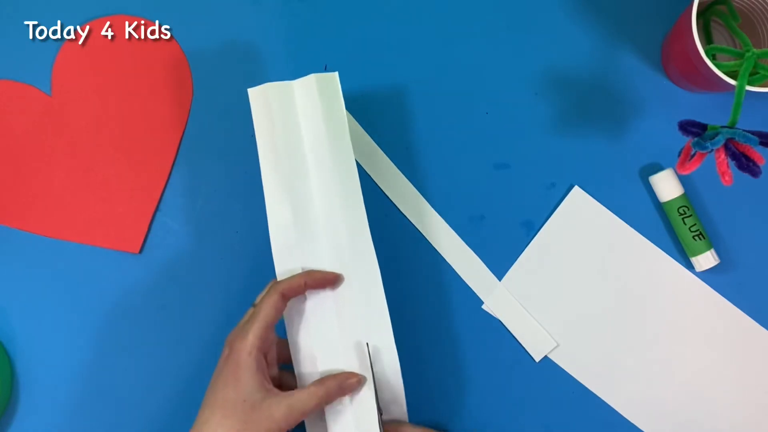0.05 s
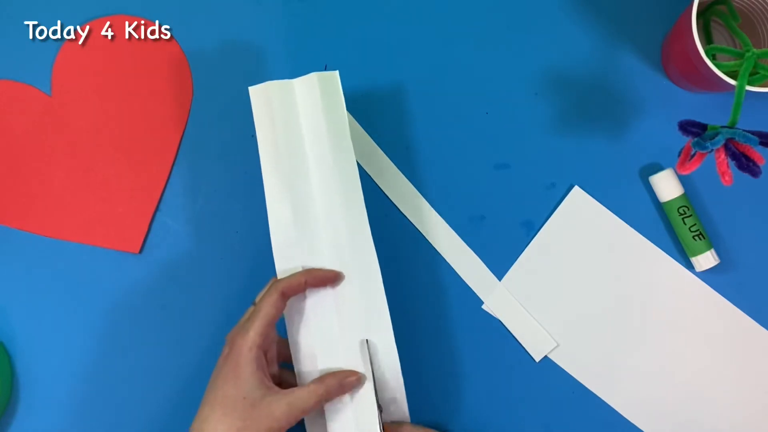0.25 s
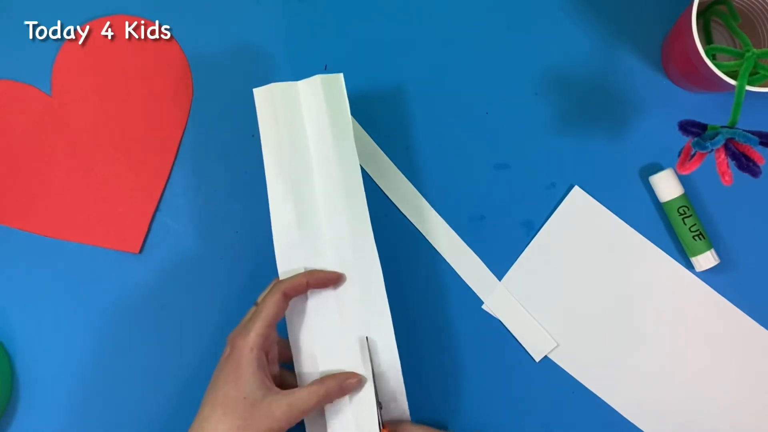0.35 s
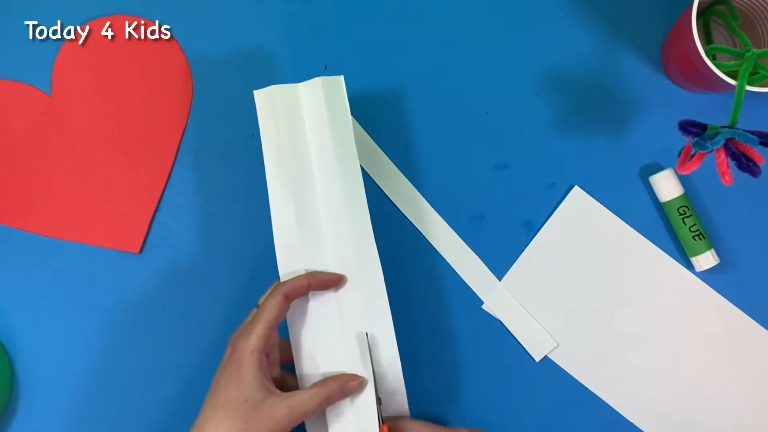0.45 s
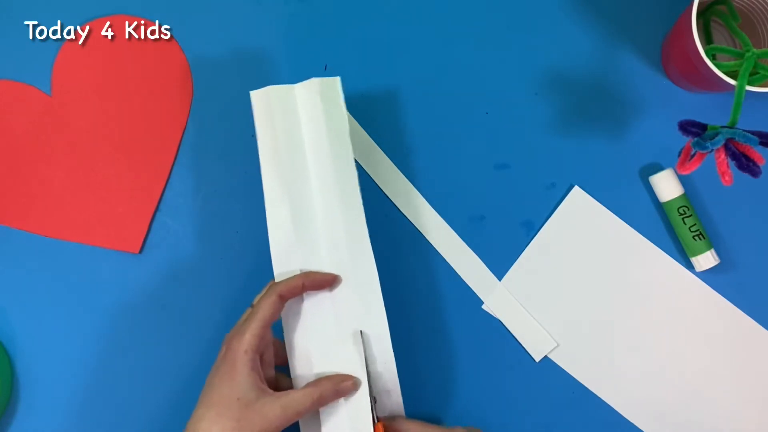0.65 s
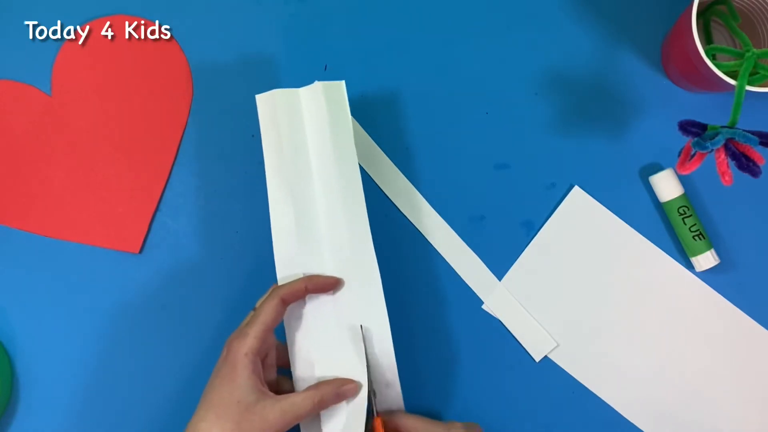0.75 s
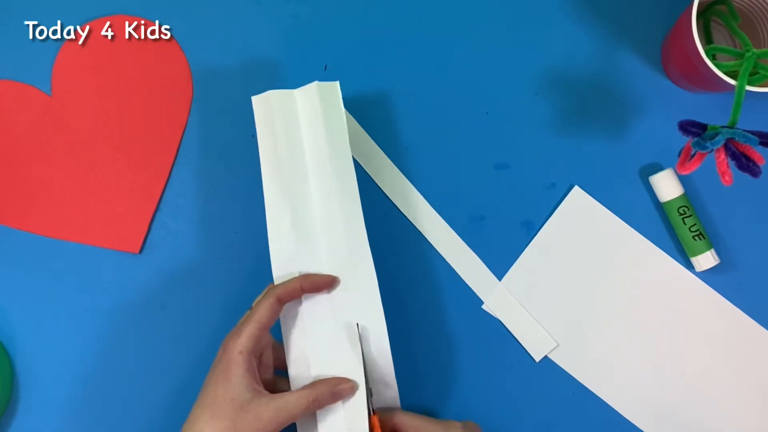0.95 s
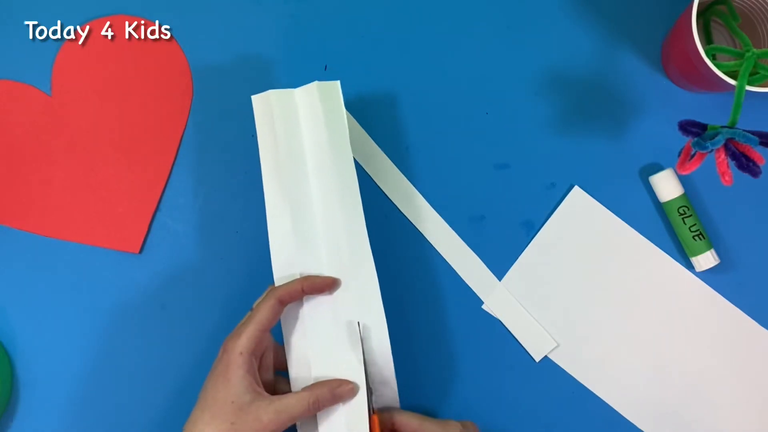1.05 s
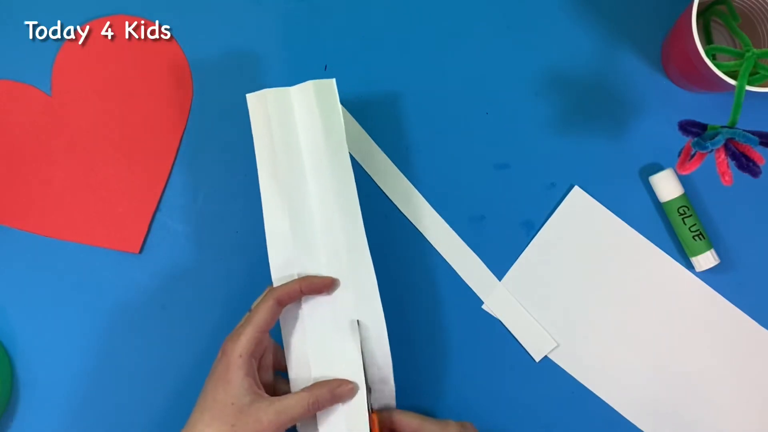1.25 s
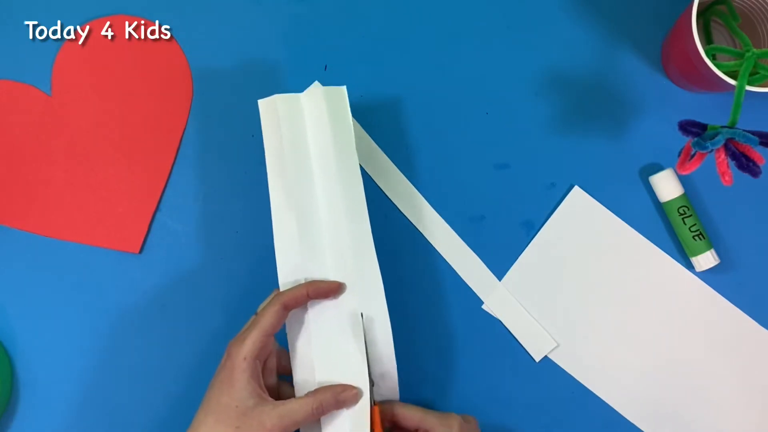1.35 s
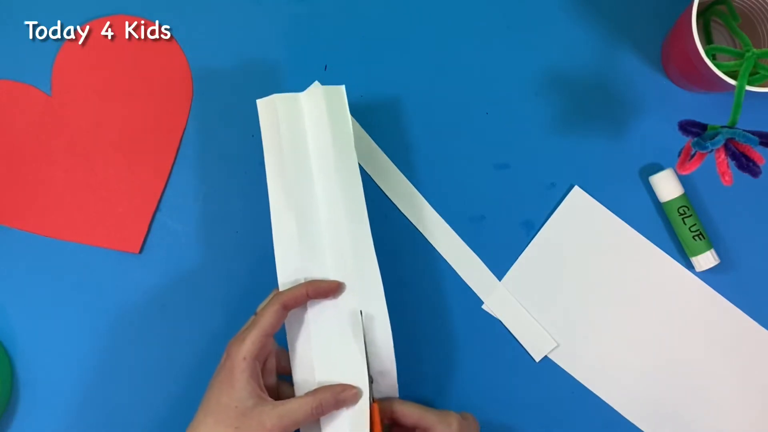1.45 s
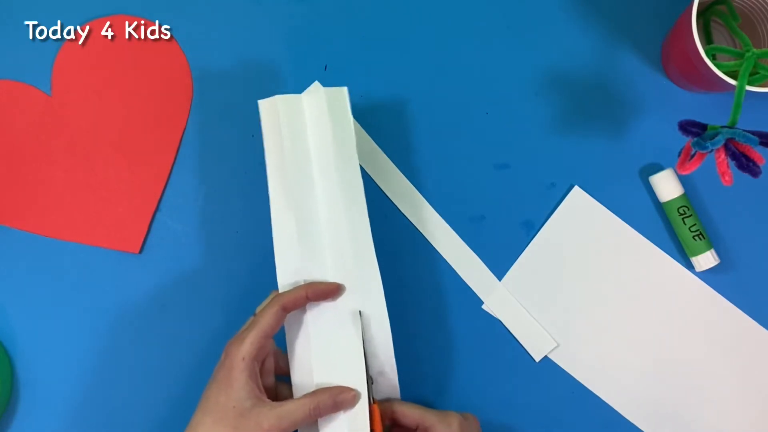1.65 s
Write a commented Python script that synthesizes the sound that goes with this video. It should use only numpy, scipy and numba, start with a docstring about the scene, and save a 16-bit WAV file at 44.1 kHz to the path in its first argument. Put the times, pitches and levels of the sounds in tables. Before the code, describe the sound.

Scissors cut folded paper, close in stereo in a small quiet room. A reopening rub starts it, then crunchy closing strokes at about 0.12-0.3, 0.46-0.65, 0.7-0.87, 1.08-1.28 and 1.45-1.63 seconds, the third fainter and brighter. Stuttering, squeaky slips fall near 0.35, 0.93, 1.32 and 1.68. Papery knocks sound at 0.41 and 0.57, the sharpest snap at 0.64. Faint low hum underneath.

```python
"""Scissors in folded paper

Scissors work through folded paper on a table, close to a two-port microphone.
Closing strokes shear the fibres in a dense rasp; opening strokes slip back in squeaking stutters.
The fold snaps and the sheet knocks. Strokes and snaps excite shared resonances of blades and sheet.
A small quiet room adds a short noisy tail, noise and a low wavering hum."""
import sys
import numpy as np
from scipy import signal
from scipy.fft import rfft, irfft, next_fast_len
from scipy.io import wavfile
from scipy.ndimage import uniform_filter1d
from numba import njit

SR = 44100
rng = np.random.default_rng(int(sys.argv[2]) if len(sys.argv) > 2 else 0)


def volts_from_db(level):
    """Convert decibel levels to linear amplitude ratios."""
    exponent = np.asarray(level, float) / 20
    return 10 ** exponent


def wav_out(sig):
    """Save sig, one row per channel (or a flat mono array), as 16-bit PCM at SR to the path in sys.argv[1]."""
    wavfile.write(sys.argv[1], SR, np.round(np.clip(np.atleast_2d(sig).T, -1, 1) * 32767).astype(np.int16))


N = 74970


def unit(x):
    """Normalization to an rms of 1."""
    return x / np.sqrt(np.mean(x ** 2))


def band(x, order, edges_hz):
    """Butterworth band-pass: passes the range between two edges."""
    return signal.lfilter(*signal.butter(order, edges_hz, "band", fs=SR), x)


def colour(x, curve, tilt_db=0.):
    """Minimum-phase filter of unit energy from (frequency [Hz], level [dB]); tilt in dB per octave."""
    hz, points = np.arange(1, 1026) * SR / 2050, np.array(curve)
    level_db = np.interp(np.log(hz), np.log(points[:, 0]), points[:, 1])
    gain = volts_from_db(level_db + tilt_db * np.log2(hz / 2000))
    # folding the cepstrum onto positive time makes the response causal
    cepstrum = irfft(np.log(gain))
    cepstrum[1:1024] *= 2
    cepstrum[1025:] = 0
    response = irfft(np.exp(rfft(cepstrum)))
    return signal.fftconvolve(x, unit(response) / np.sqrt(len(cepstrum)))[:len(x)]


def ring(x, hz, width_hz):
    """Simple resonance: a two-pole peak with gain 1 at its centre."""
    return signal.lfilter(*signal.iirpeak(hz, hz / width_hz, SR), x)


@njit
def glide(x, hz, width_hz):
    """Time-varying resonance: a state-variable band-pass whose centre moves every sample."""
    y, band_state, low_state = np.empty(len(x)), 0., 0.
    for i in range(len(x)):
        g, damping = np.tan(np.pi * hz[i] / SR), width_hz / hz[i]
        v = (band_state + g * (x[i] - low_state)) / (1 + g * (g + damping))
        band_state = 2 * v - band_state
        low_state += 2 * g * v
        y[i] = damping * v
    return y


def walk(per_s):
    """Smoothed random steps, per_s of them each second: a slow fluctuation of rms 1."""
    hold = int(SR / per_s)
    steps = np.repeat(rng.standard_normal(N // hold + 1), hold)
    return unit(uniform_filter1d(steps, hold)[:N])


def fibres(per_s, spread_db):
    """Shot noise: tears at random instants, of random sign and uneven size, scaled to rms 1."""
    chance, side, size = rng.random((3, N))
    height = volts_from_db(-spread_db * np.log(size + 1e-9))
    return unit((chance < per_s / SR) * np.sign(side - .5) * height)


def crunch():
    """Modulated shot noise: fibres tear in clumps, each range of pitch swelling on its own."""
    band_edges = [100, 700, 1400, 2600, 4300, 6000, 9000, 20000]  # edges of the ranges: (frequency [Hz])
    tears = fibres(12000, 1.8)
    total = 0
    for edge_pair in zip(band_edges, band_edges[1:]):
        swell = volts_from_db(3 * walk(70))
        total = total + swell * band(tears, 2, edge_pair)
    return unit(total)


def closing(t):
    """Shear fracture: dense tearing follows the push of the hand and rings the free length of fold."""
    # one list per closing stroke: (time [s], relative shear level [dB], rasp pitch [Hz])
    strokes = [
        [(.118, -69, 1960), (.137, -37.5, 1850), (.177, -39.5, 1820), (.205, -32.5, 1910), (.235, -38, 1860),
         (.275, -43, 1820), (.292, -38, 1850), (.305, -58, 1870)],
        [(.455, -64, 2030), (.474, -39, 2100), (.484, -36, 2080), (.53, -41, 1870), (.564, -41, 1910),
         (.59, -47, 1260), (.63, -49, 1440), (.641, -35.5, 1500), (.65, -88, 1500)],
        [(.69, -48, 1920), (.72, -64, 1920), (.75, -53.5, 1990), (.756, -56, 1940), (.772, -50.5, 2000),
         (.787, -46, 2870), (.795, -41, 3480), (.855, -45, 3360), (.868, -65, 3460)],
        [(1.076, -82, 2005), (1.084, -46, 2060), (1.092, -35.5, 2030), (1.135, -33, 1754), (1.16, -33.5, 1660),
         (1.19, -35.5, 1780), (1.225, -41, 2150), (1.245, -52.5, 1000), (1.27, -52.5, 1020), (1.28, -86, 1000)],
        [(1.453, -99.5, 2093), (1.457, -41, 1980), (1.464, -68.5, 2020), (1.467, -45, 2100),
         (1.489, -33.5, 2110), (1.525, -36, 2110), (1.545, -37.5, 1840), (1.575, -38.5, 2040), (1.6, -35, 574),
         (1.615, -54.5, 490), (1.635, -63, 500)],
    ]
    # brightness, one value per stroke: (tilt [dB per octave])
    stroke_tilts = [-0.7, -1.4, -0.69, -0.27, -0.71]
    # spectrum of sheared paper: (frequency [Hz], relative level [dB])
    shear_curve = [(150, -83.5), (350, -13), (700, -4), (1200, -7), (2000, -5.5), (2800, -7), (4200, -6),
                   (7000, -4), (10500, -8), (15500, -22.5)]
    silent_db = -120
    grain, out = volts_from_db(2 * walk(130)) * crunch(), 0
    for stroke, tilt in zip(strokes, stroke_tilts):
        s, db, hz = np.array(stroke).T
        push_db = np.interp(t, s, db, left=silent_db, right=silent_db)
        tears = volts_from_db(push_db) * grain
        out = out + colour(tears + rasp(tears, np.interp(t, s, hz)), shear_curve, tilt)
    return out


def rasp(tears, hz):
    """Forced resonance: the free length of the fold rings at its pitch and at one overtone."""
    width_hz, overtone = 160., 2.05
    main = volts_from_db(7.5) * glide(tears, hz, width_hz)
    return main + glide(tears, overtone * hz, overtone * width_hz)


def opening(t):
    """Stick-slip friction: each slip swells and fades around its peak and squeaks at its own pitch."""
    # slips of the opening blades:
    # (time of peak [s], relative level [dB], swell time from 1/e to peak [s], squeak pitch [Hz])
    slips = [(.004, -26.5, 0.015, 1165), (0.031, -39, 0.017, 1290), (0.052, -30.5, 0.0017, 1210),
             (0.055, -41.5, 0.0048, 1137), (0.32, -24.5, 0.0032, 1318), (0.322, -36, 0.014, 1380),
             (0.334, -29.5, 0.011, 1230), (0.356, -25.5, 0.0062, 1140), (0.376, -31.5, 0.016, 1170),
             (0.388, -37, 0.018, 1080), (0.893, -38, 0.0082, 1000), (0.906, -29, 0.0059, 980),
             (0.927, -28.5, 0.0095, 1394), (0.947, -29.5, 0.014, 993), (0.964, -27.5, 0.0061, 1130),
             (0.983, -27, 0.0083, 1077), (1.278, -25.5, 0.0039, 1010), (1.301, -26, 0.01, 1014),
             (1.32, -26.5, 0.0059, 1100), (1.334, -22, 0.0057, 1152), (1.357, -26, 0.0071, 1032),
             (1.665, -23, 0.0082, 1150), (1.682, -28, 0.011, 980), (1.695, -27, 0.015, 970)]
    # spectrum of rubbing paper: (frequency [Hz], relative level [dB])
    slip_curve = [(150, -50.5), (350, -13.5), (700, -6.5), (1150, -6.5), (2000, -6), (2700, -8),
                  (3500, -6.5), (7000, -10), (10500, -13.5), (15500, -25)]
    fade_ratio = 1.186  # fade length over swell length
    swells = 0
    for s, db, swell_s, _ in slips:
        span = swell_s * np.where(t > s, fade_ratio, 1)
        swells = swells + volts_from_db(db - 10) * np.exp(-((t - s) / span) ** 2)
    rub = swells * crunch()
    peak_s, _, _, pitch_hz = np.array(slips).T
    squeak = volts_from_db(7) * glide(rub, np.interp(t, peak_s, pitch_hz), 128.)
    return colour(rub + squeak, slip_curve)


def snaps(t):
    """Impulsive release of the fold: a fast rise, a short crackle, an exponential fall."""
    # snaps of the fold: (time [s], relative level [dB], time until the fall [s], tilt [dB per octave])
    snap_events = [(0.2185, -24, 0.0012, 0.5), (0.244, -17, 0.0072, 1), (0.5243, -29, 0.00086, -4.5),
                   (0.6087, -15.5, 0.0023, 3.5), (0.6129, -20, 0.0024, 0.5), (.642, -13.5, 0.0045, -0.5),
                   (0.6441, -7, 0.0037, 1.5), (0.65, -22.5, 0.0048, -3.5), (0.755, -35.5, .001, -1),
                   (0.7663, -35, 0.00068, -3), (0.7942, -35.5, 0.0013, -1.5), (0.858, -39.5, 0.00077, -5),
                   (1.4633, -40.5, 0.00089, -4)]
    # spectrum of a snap before its tilt: (frequency [Hz], relative level [dB])
    snap_curve = [(150, -44), (300, -22), (450, -3), (750, -7), (1000, -6), (1200, -2), (2200, -0.5),
                  (3000, -6), (4500, -1), (5800, -7), (7200, -4), (8600, -11), (10500, -12), (15500, -19)]
    rise_s, fall_s = .001, .002
    cracks, out = fibres(16000, 1.2), 0
    for s, db, hold, tilt in snap_events:
        rise = np.clip((t - s) / rise_s, 0, 1)
        fall = np.exp(-np.maximum(t - s - hold, 0) / fall_s)
        out = out + colour(volts_from_db(db - 2) * rise * fall * cracks, snap_curve, tilt)
    return out


def bump(u):
    """Critically damped pulse: peaks at 1 when u is 1."""
    return u * np.exp(1 - u)


def knocks(t):
    """Damped oscillation: a soft push rings the sheet for a few cycles, a dull crackle rides on it."""
    # dull knocks of the sheet on the table, the last one a brief low scrape: (time [s], relative level [dB],
    # pitch [Hz])
    knock_events = [(0.4078, -13, 632), (0.4127, -21.5, 1390), (.429, -31.5, 593), (0.5719, -14.5, 815),
                    (0.5768, -18, 1700), (0.644, -39.5, 101), (1.237, -41.5, 430)]
    # spectrum of the crackle: (frequency [Hz], relative level [dB])
    tick_curve = [(150, -27.5), (500, -2.5), (1500, 1.5), (2200, 0), (3500, -9.5), (5000, -12.5),
                  (8000, -30), (15500, -35.5)]
    peak_cycles, tick_peak_s = .56, .0012  # from onset to the peak of push and crackle
    cutoff_share = .65  # share of the knock pitch below which the push is cut away
    cracks, out = rng.standard_normal(N), 0
    for s, db, hz in knock_events:
        late = np.maximum(t - s, 0)
        push = bump(late * hz / peak_cycles) * np.sin(2 * np.pi * hz * late)
        knock_wave = signal.lfilter(*signal.butter(3, cutoff_share * hz, "high", fs=SR), push)
        tick = volts_from_db(-10) * colour(bump(late / tick_peak_s) * cracks, tick_curve)
        out = out + volts_from_db(db) * (knock_wave + tick)
    return out


def body(x, share_db, widen, shift_db):
    """Modal resonance of blades and sheet; with shift_db each mode comes and goes as the grip shifts."""
    # modes of blades and sheet: (frequency [Hz], width before widening [Hz], relative level [dB])
    modes = [(530, 29, -5), (780, 122, -2.5), (970, 17, -1.5), (1205, 72, 3.5), (1457, 44, -11),
             (1700, 28, -0.5), (1942, 230, -10), (2220, 49, -9.5), (2700, 47, -9.5), (3150, 62, -3.5),
             (3370, 73, -1), (3680, 42, -4.5), (3780, 110, -18), (4440, 23, -24.5), (4765, 53, -11.5),
             (4920, 50, -12.5), (6000, 44, -12.5), (6710, 570, -1.5)]
    ringing = 0
    for hz, width_hz, db in modes:
        driven = x * volts_from_db(shift_db * walk(25.47))
        ringing = ringing + volts_from_db(db + 6) * ring(driven, hz, width_hz * widen)
    return x + volts_from_db(share_db) * ringing


def room(x):
    """Diffuse reverberation: decaying noise tails that differ at the two ports, mostly in the lower part."""
    t60_s, late_t60_s, late_db = .085, .27, -13  # the late part is slower and fainter
    thin_hz, apart_hz, dull_hz, apart = 920, 4160, 10000, 1.05
    t = np.arange(SR // 2) / SR
    decay = volts_from_db(-60 * t / t60_s) + volts_from_db(late_db - 60 * t / late_t60_s)
    mid, side = rng.standard_normal((2, len(t))) * decay * (t > .003)
    side = apart * band(side, 2, (thin_hz, apart_hz))
    wet = []
    for sign in (1, -1):
        tail = band(mid + sign * side, 1, (thin_hz, dull_hz))
        tail = volts_from_db(-13) * tail / np.sqrt(np.sum(tail ** 2))
        wet.append(signal.fftconvolve(x, tail)[:N])
    return np.array(wet)


def air():
    """Partly coherent noise: room tone differing at the ports mainly in its middle range, and a hum."""
    # spectrum of the room tone: (frequency [Hz], relative level [dB])
    air_curve = [(20, -2.5), (40, -8), (110, -11), (180, -10), (300, -14.5), (1000, -27), (3000, -33),
                 (7000, -29), (15500, -48.5)]
    # low hum: (frequency [Hz], level before the wavering [dB], width of each of two passes [Hz])
    hum_modes = [(62.1, -62.5, 16), (95.2, -63, 23)]
    mid = colour(rng.standard_normal(N), air_curve)
    side = colour(rng.standard_normal(N), air_curve)
    side = .82 * band(side, 2, (150.5, 4160))
    hum = 0
    for hz, db, width_hz in hum_modes:
        once = ring(rng.standard_normal(N), hz, width_hz)
        hum = hum + volts_from_db(db) * unit(ring(once, hz, width_hz))
    tone = volts_from_db(-61) * (mid + side * np.array([[1], [-1]]))
    return tone + hum * volts_from_db(2 * walk(24))


def scene():
    """Superposition: strokes and snaps ring the body, knocks bypass it; room and air surround them."""
    t = np.arange(N) / SR
    strokes = body(closing(t) + opening(t), share_db=-1.5, widen=1.2, shift_db=4.5)
    snapping = body(snaps(t), share_db=-2, widen=1.1, shift_db=0)
    near = strokes + snapping + knocks(t)
    return near + room(near) + air()


def low_pass(x):
    """Removes everything above the highest recorded frequency."""
    return signal.sosfilt(signal.butter(12, 16300, fs=SR, output="sos"), x)


def record(dry):
    """Interaural-style phase difference: the second port lags by frequency; the top is cut."""
    # phase lag of the second port: (frequency [Hz], lag [rad])
    port_lag = [(0, 0), (300, -.25), (860, -.8), (1250, -.2), (1900, 0), (2600, .5), (3200, .6), (4900, 0),
                (5860, 1.6), (6900, np.pi), (7900, np.pi), (8600, 4.3), (9900, 2 * np.pi),
                (11300, 2 * np.pi), (12050, 7.8), (12700, 3 * np.pi), (14600, 3 * np.pi),
                (15500, 4 * np.pi)]
    size = next_fast_len(N + 2048)
    lag = np.interp(np.arange(size // 2 + 1) * SR / size, *np.array(port_lag).T)
    turn = np.exp(1j * lag * np.array([[0], [-1]]))
    ports = irfft(rfft(dry, size) * turn, size)[:, :N]
    soft = signal.sosfilt(signal.butter(8, 15900, fs=SR, output="sos"), ports)
    return low_pass(soft)


dry = scene()
out = record(dry)
wav_out(out)
```